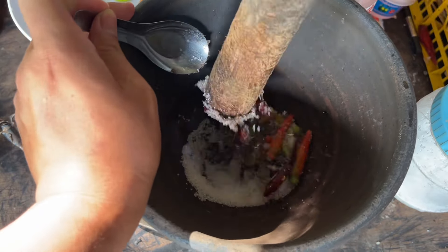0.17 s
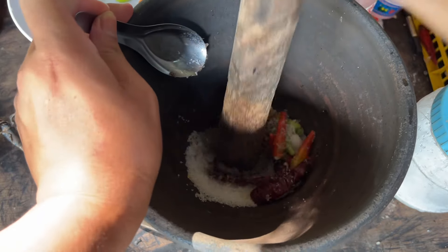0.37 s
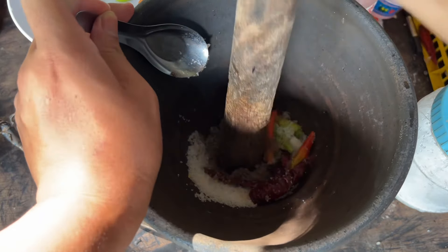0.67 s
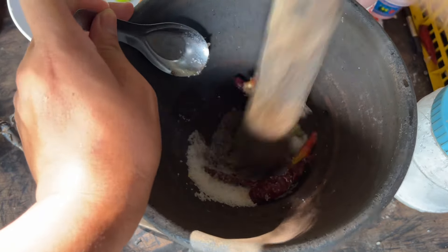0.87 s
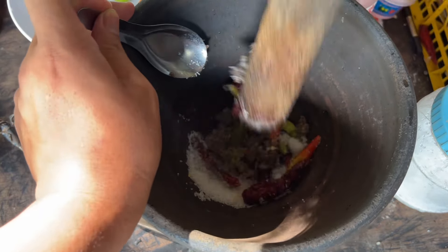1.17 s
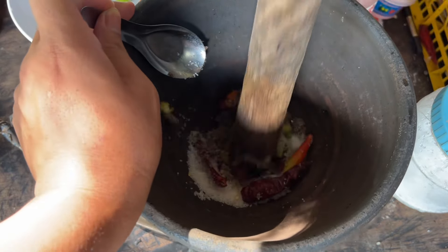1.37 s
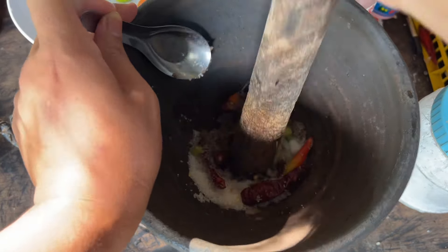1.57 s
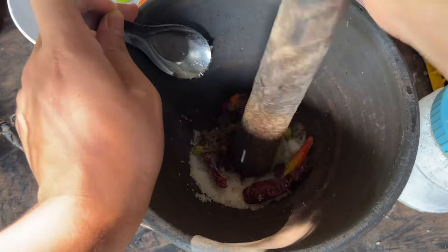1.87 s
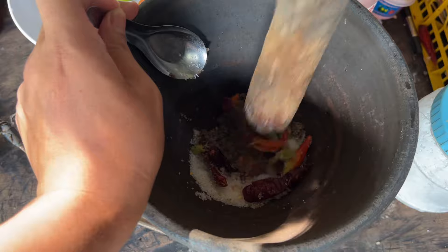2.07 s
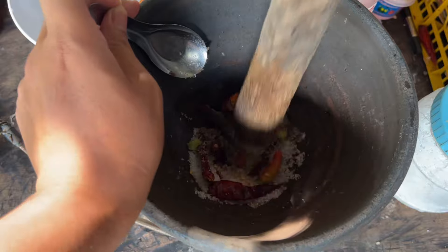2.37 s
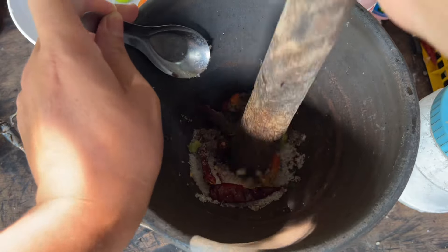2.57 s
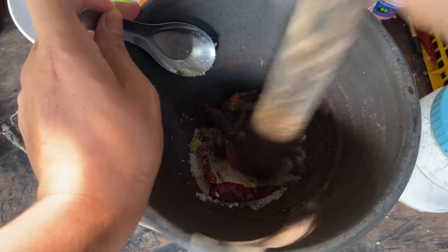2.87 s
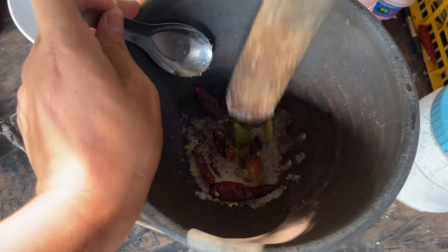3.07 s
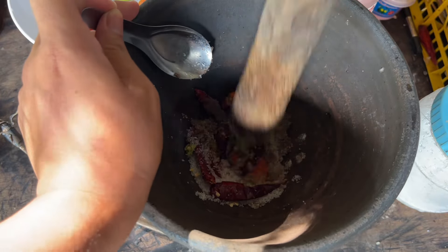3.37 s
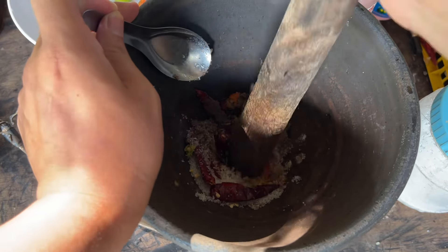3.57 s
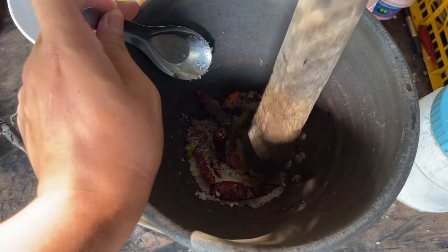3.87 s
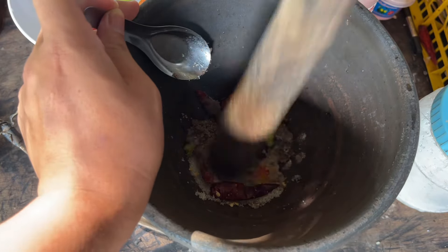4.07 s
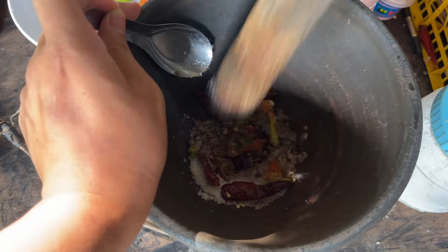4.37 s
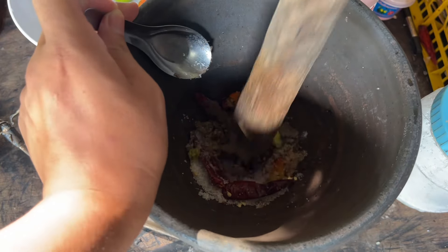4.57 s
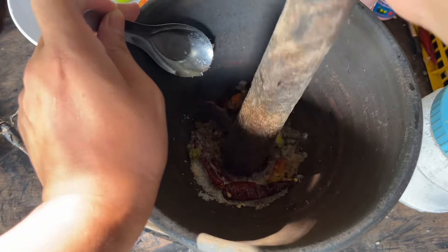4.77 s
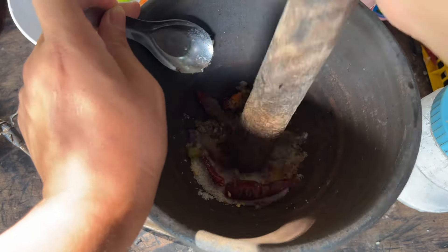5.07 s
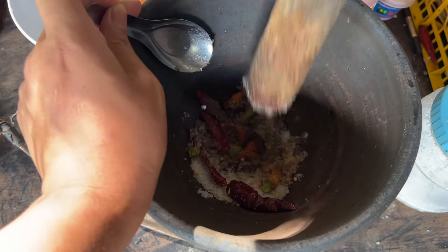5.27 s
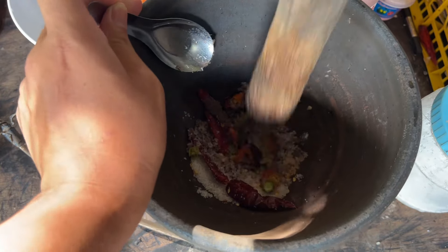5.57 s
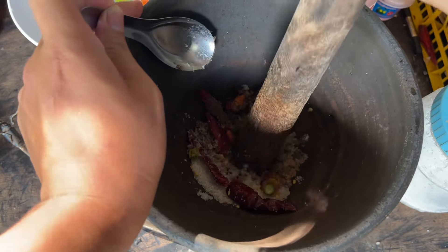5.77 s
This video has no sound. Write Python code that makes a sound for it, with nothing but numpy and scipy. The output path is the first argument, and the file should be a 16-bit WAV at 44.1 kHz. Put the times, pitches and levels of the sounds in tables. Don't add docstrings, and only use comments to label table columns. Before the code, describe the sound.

Steady hollow thuds of wood in a resonant mortar crush crunchy sugar, while a spoon ticks the wall and crumbs patter between strokes.

```python
import sys
import numpy as np
from scipy import signal
from scipy.fft import rfft, irfft
from scipy.io import wavfile
from scipy.ndimage import uniform_filter1d

SR = 44100
rng = np.random.default_rng(int(sys.argv[2]) if len(sys.argv) > 2 else 0)


def boost_factor(decibels):
    exponent = np.asarray(decibels, float) / 20
    return 10 ** exponent


def unload_audio(sound):
    columns = np.transpose(np.atleast_2d(sound))
    steps = np.round(np.clip(columns, -1, 1) * 32767)
    wavfile.write(sys.argv[1], SR, steps.astype(np.int16))


N = 260631
FREQ = np.fft.rfftfreq(N, 1 / SR)
TIME = np.arange(N) / SR

# first touch in seconds, rise in ms, fall in ms, level in dB,
# treble tilt in dB.
CRUSHES = [(0.1837, 9.2, 6.1, -24.5, 0.5), (0.4953, 9.5, 9.5, -23.5, -1), (0.8181, 12.7, 1.4, -21, 1.5),
           (1.1617, 3, 8.5, -21.5, -1), (1.4854, 7.8, 13.4, -24, 4), (1.8127, 12.6, 2.9, -18, 1),
           (2.1434, 3.2, 32, -19, 3.5), (2.4895, 3, 2.4, -21, 0.5), (2.8195, 3.1, 45, -27.5, 3),
           (3.1322, 15.3, 2.9, -19.5, -1), (3.4595, 17.5, 8.1, -26.5, 3), (4.0174, 23.3, 14.6, -20, 0.5),
           (4.3588, 3.1, 2.9, -22, 2), (4.6818, 11, 4, -15, -4), (5.0114, 3.5, 1.5, -25.5, 3),
           (5.3356, 9.6, 15, -24.5, 2.5), (5.6547, 16.4, 6.9, -28.5, 8.5)]
# start in seconds, mortar ring in dB, pestle and cavity in dB,
# floor thud in dB, pitch the spot favours in Hz.
BLOWS = [(0.2009, -0.5, -5.5, -14.5, 479), (0.5202, -16, -13.5, -15.5, 415),
         (0.8481, -10.5, -9, -15.5, 438), (1.184, -14.5, -12, -14, 416), (1.504, -12.5, -12, -12, 570),
         (1.8258, -9, -8.5, -11, 445), (2.1507, -11.5, -27, -14, 555), (2.502, -8, -5, -14, 410),
         (2.8234, -1.5, -8, -20.5, 551), (3.1504, 1.5, -3.5, -13.5, 499), (3.482, -6.5, -4.5, -11, 445),
         (4.0414, -15.5, -15.5, -14, 481), (4.372, -6, -3.5, -17, 399), (4.6954, 0, -1.5, -13.5, 501),
         (5.0349, -31.5, -27.5, -24.5, 420), (5.3508, -18, -12, -15, 578), (5.6728, 1, -4.5, -14.5, 445)]
# delay after the blow in ms, mortar in dB,
# pestle in dB, favoured pitch in Hz.
LIFTS = [(70.24, -18.5, -24.5, 390), (53.7, -25, -25.5, 300), (33.24, -23.5, -26.5, 460),
         (55.5, -22, -23, 440), (60.8, -16, -21.5, 484), (65.2, -12.5, -13.5, 470),
         (46.86, -12, -17.5, 450), (60.4, -17.5, -19.5, 360), (54.8, -46, -32, 850),
         (68.6, -18, -23.5, 425), (60.1, -19, -18.5, 540), (61.16, -28, -20, 430), (64.5, -18.5, -20, 515),
         (67.4, -16.5, -22, 470), (56.1, -29, -23.5, 490), (62.3, -18, -17, 450), (63.3, -22, -19, 532)]
# air squeezed ahead in dB, rim ring under the mortar's in dB, grain spray in dB.
STROKES = [(-1.5, -8.5, -45.5), (3, -40, -42.5), (-0.5, -12.5, -46.5), (1.5, -27.5, -48), (3, -39.5, -49.5),
           (-4, -17, -45), (-6.5, -15, -44.5), (-5, -14.5, -45.5), (6, -11.5, -48.5), (-9, -14.5, -47),
           (-1, -18, -46.5), (-14, -32, -53.5), (-11.5, -13, -49.5), (2, -6, -46.5), (-6, -28, -50.5),
           (-5, -15, -49), (-4.5, -12.5, -47.5)]
# frequency in Hz, level in dB.
CRUSH_COLOUR = [(200, -4.5), (600, -5.5), (1100, 0), (1950, 4), (3500, -2), (5800, -7.5), (9300, -8),
                (11600, -4), (15900, -12.5), (16600, -44)]


def unit(x):
    return x / np.sqrt(np.mean(x ** 2))


def colour(x, points):
    hz, db = np.transpose(points)
    gain_db = np.interp(np.log(FREQ + 1), np.log(hz), db, left=-80, right=-80)
    return unit(irfft(rfft(x) * boost_factor(gain_db), N))


def walk(rate):
    hold = int(SR / rate)
    slewed = np.repeat(rng.standard_normal(N // hold + 1), hold)
    for _ in range(2):
        slewed = uniform_filter1d(slewed, hold, mode="wrap")
    return np.clip(unit(slewed[:N]), -2.5, 2.2)


def grains(points, spiky_db, shared):
    sizes = np.minimum(rng.exponential(size=(3, N)), 5)
    cracks = rng.standard_normal((3, N)) * boost_factor(spiky_db * sizes)
    return colour(np.sqrt(shared) * cracks[0] + np.sqrt(1 - shared) * cracks[1:], points)


def mottle(x, patchy_db, rate):
    edges = 350 * 1.28 ** np.arange(17)
    total = 0
    for k, pair in enumerate(zip(edges, edges[1:])):
        band = signal.butter(2, pair, "band", fs=SR, output="sos")
        total = total + (-1) ** k * boost_factor(patchy_db * walk(rate)) * signal.sosfilt(band, x)
    return unit(total)


def strike(events, modes, push_ms, vary_db, detune, grip_ms=13.0, free=0.85, focus_db=40.0):
    out, t = np.zeros(N + SR), np.arange(SR // 4) / SR
    hz, db, t60 = np.transpose(modes)[:, :, None]
    chance = rng.uniform(-1, 1, (len(events), 2, len(modes), 1))
    push = 1 - np.exp(-(t * 1000 / push_ms) ** 2)
    shape = push * (free + (1 - free) * np.exp(-t * 1000 / grip_ms))
    for (s, peak_db, *favoured), (size, shift) in zip(events, chance):
        octaves_off = np.abs(np.log2(hz / favoured[0])) if favoured else 0
        mode_db = db + vary_db * size - focus_db * octaves_off
        fade = boost_factor(mode_db - 60 * t / np.clip(t60, .005, .4))
        ring = shape * np.sum(fade * np.sin(2 * np.pi * hz * (1 + detune * shift) * t), axis=0)
        start = int(s * SR)
        out[start:start + len(ring)] += boost_factor(peak_db) * ring / np.abs(ring).max()
    return out[:N]


def place(x, pan_db, lead):
    late = np.interp(np.arange(N) - lead, np.arange(N), x)
    return np.array([x * boost_factor(pan_db / 2), late * boost_factor(-pan_db / 2)])


def crumbs(rows):
    out, t = np.zeros((2, N + SR)), np.arange(SR // 20) / SR
    grit = rng.standard_normal((len(rows), 3, len(t)))
    for (s, db, hz, t60_ms), g in zip(rows, grit):
        g = g[0] + 0.63 * g[1:]
        band = signal.butter(1, [hz / 1.35, min(hz * 1.2, .4 * SR)], "band", fs=SR, output="sos")
        fade = np.clip(t / 0.00087, 0, 1) * boost_factor(-60 * t * 1000 / max(t60_ms, 3))
        edge = boost_factor(-16.5) * np.diff(g, prepend=0)
        burst = fade * (unit(signal.sosfilt(band, g)) + edge)
        start = int(s * SR)
        out[:, start:start + len(t)] += boost_factor(db) * burst / np.abs(burst).max()
    return out[:, :N] * boost_factor([[1.2], [-1.2]])


def kitchen():
    # frequency in Hz, level in dB per Hz.
    air_colour = [(15, 1.5), (25, -33), (118, 3.5), (342, 6.5), (558, 1), (937, -16.5), (8060, -26),
                  (10300, -39.5), (11500, -101), (15500, -44), (16800, -33.5)]
    # pitch in Hz, width in Hz, level in dB.
    hum_lines = [(130, 9.9, -53.5), (416, 13, -68), (810, 45, -83)]
    out = boost_factor(-60.0 + 1.5 * walk(2.48)) * grains(air_colour, spiky_db=3.0, shared=0.07)
    for hz, width, db in hum_lines:
        line = [(hz - width, -30), (hz, 0), (hz + width, -30)]
        out = out + boost_factor(db + 2.0 * walk(14)) * grains(line, spiky_db=2.5, shared=0.84)
    return out


def settling():
    # time in seconds, crumbs trickling in dB, shudder of floor and hand in dB.
    restless = [(0.0, -43.5, -34.5), (0.06, -60, -34), (0.14, -56, -33.5), (0.33, -67, -40),
                (0.67, -61, -43), (1.3, -63.5, -50.5), (2.06, -61, -48.5), (2.6, -69, -41),
                (2.91, -59.5, -54.5), (3.399, -65, -45), (3.64, -53.5, -50), (3.85, -66, -51),
                (3.98, -64.5, -61), (4.6, -70, -48.5), (5.499, -60.5, -51.5), (5.91, -60.5, -43.5)]
    # frequency in Hz, level in dB.
    trickle_colour = [(700, -13), (1500, -1), (2500, -2.5), (5000, -6.5), (9200, -7.5), (11500, -7.5),
                      (15900, -9.5), (16500, -44.5)]
    squelch_colour = [(150, 17), (260, 10.5), (550, 6.5), (900, -10.5), (1500, -9.5), (2500, -28.5)]
    shudder_colour = [(20, -43.5), (45, 8.5), (80, 7.5), (130, -1.5), (200, -2), (300, -38)]
    s, trickle_db, shudder_db = np.transpose(restless)
    blows = np.array(BLOWS)[:, 0]
    since = TIME - np.append(-1, blows)[np.searchsorted(blows, TIME)]
    pinned = np.clip(1 - since / 0.092, 0, 1)
    trickle_db = np.interp(TIME, s, trickle_db) - 7 * pinned
    shudder_db = np.interp(TIME, s, shudder_db) - 9.5 * pinned
    falling = mottle(grains(trickle_colour, spiky_db=3.5, shared=.5), patchy_db=2.6, rate=80)
    trickle = boost_factor(trickle_db + 2.5 + 2.2 * walk(24.8)) * falling
    squelch = boost_factor(trickle_db + 5.5 + 3.8 * walk(49)) * grains(squelch_colour, spiky_db=1.5, shared=0.84)
    shudder = boost_factor(shudder_db + 2.7 * walk(8.8)) * grains(shudder_colour, spiky_db=1.5, shared=0.89)
    return trickle + squelch + shudder


def dishes():
    # start in seconds, level in dB.
    nudges = [(0.029, -37), (0.349, -38), (0.395, -53), (0.62, -33.5), (0.7, -39), (0.942, -34),
              (2.031, -34), (2.346, -33), (2.387, -41.5), (2.696, -37.5), (2.729, -44), (2.969, -65.5),
              (3.326, -38.5), (3.367, -43), (3.615, -35.5), (3.722, -38.5), (3.855, -49.5), (4.181, -43),
              (4.899, -45), (5.149, -44), (5.528, -39), (5.579, -43), (5.854, -43.5)]
    # frequency in Hz, level in dB, t60 in seconds.
    dish_modes = [(816.5, -1, 0.13), (1107, -10, 0.1), (1402, -12, 0.085), (445, 3.5, 0.07)]
    return place(strike(nudges, dish_modes, 1.8, vary_db=0, detune=0.018), 0.82, 11.6)


def snaps():
    # start in seconds, level in dB, pitch in Hz, t60 in ms.
    snap_rows = [(0.0983, -35.5, 4070, 12), (0.1995, -10, 1540, 2.5), (0.4928, -32, 3900, 8.7),
                 (0.5004, -35, 2000, 6), (0.5082, -40, 2350, 15), (0.518, -18, 6500, 6.9),
                 (0.5596, -46, 4500, 20), (0.6504, -36, 4000, 57), (0.806, -36, 2500, 8.7),
                 (0.83, -12.5, 2800, 4.6), (1.0914, -48.5, 4550, 10), (1.1702, -11.5, 3670, 12),
                 (1.461, -47, 3000, 13), (1.493, -28, 2760, 7), (1.8243, -16, 4360, 14),
                 (1.882, -22.5, 1830, 98), (2.1494, -3.5, 1950, 2.3), (2.1765, -13, 4000, 13),
                 (2.315, -44.5, 9000, 9.2), (2.358, -37, 3200, 7.8), (2.393, -44, 2700, 6.6),
                 (2.4902, -31.5, 1600, 17), (2.5162, -27.5, 5000, 6.1), (2.7396, -49.5, 3000, 8.9),
                 (2.797, -39.5, 5500, 23), (2.8485, -24, 6140, 14), (3.008, -42.5, 9000, 8),
                 (3.046, -47.5, 5960, 8), (3.1337, -24, 1670, 32), (3.1469, -11.5, 2420, 21),
                 (3.201, -33, 4500, 110), (3.4615, -22.5, 2410, 66), (3.475, -11, 2500, 10),
                 (3.6408, -31, 2090, 14), (3.6591, -33.5, 2210, 14), (3.7135, -52, 2130, 12),
                 (3.722, -40, 2260, 7.5), (3.7529, -45, 3060, 16), (4.0178, -25, 1756, 48),
                 (4.0352, -12, 2052, 11), (4.3645, -17, 2820, 4), (4.6918, -26, 1950, 6.6),
                 (5.0197, -11.5, 2980, 7.2), (5.1114, -38.5, 2160, 6.6), (5.18, -42, 3500, 10),
                 (5.3457, -11, 5340, 17), (5.5756, -43.5, 3000, 23), (5.6599, -17.5, 2860, 60)]
    return crumbs(snap_rows)


def knock_rows():
    # start in seconds, mortar in dB,
    # pestle and cavity in dB, floor in dB.
    slip_rows = [(0.1126, -72, -46, -34.5), (0.539, -51, -45, -22), (0.553, -23.5, -20, -56),
                 (0.831, -18.5, -27.5, -12), (0.889, -40, -27.5, -26), (1.2118, -19, -23.5, -33),
                 (1.535, -17, -19.5, -32.5), (1.8612, -18, -10.5, -18.5), (2.17, -14.5, -8.5, -11.5),
                 (2.5211, -25.5, -10.5, -41), (2.5405, -16.5, -19, -28.5), (2.6286, -67, -35, -32),
                 (3.5141, -16, -18.5, -39), (3.557, -33, -44, -32.5), (4.086, -50.5, -20, -41.5),
                 (5.0198, -18.5, -22, -30.5), (5.0629, -30, -28.5, -27), (5.385, -11, -13.5, -38),
                 (5.7508, -31, -27, -47)]
    blows, lifts, slips = np.array(BLOWS), np.array(LIFTS), np.array(slip_rows)
    lift_s = blows[:, 0] + lifts[:, 0] / 1000
    lift_thud_db = blows[:, 3] - 22
    lifted = np.column_stack([lift_s, lifts[:, 1:3], lift_thud_db, lifts[:, 3]])
    rocked = lifted + [0.034, -18.5, -15, -0.5, 0]
    rocked[:, 0] += 0.01045 * rng.uniform(-1, 1, len(blows))
    slip_hz = 445 + 43.8 * rng.uniform(-1, 1, len(slips))
    return np.vstack([blows, lifted, rocked, np.column_stack([slips, slip_hz])])


def knocks():
    # frequency in Hz, level in dB, t60 in seconds.
    mortar_modes = [(415.6, -6, 0.2), (445, 3.5, 0.074), (512, 0, 0.14), (541, -4, 0.17), (570.7, 2, 0.11),
                    (656, -19.5, 0.018), (694, 2, 0.022), (843, -17, 0.42)]
    cavity_modes = [(168.2, 1.5, 0.091), (190.9, -1, 0.15), (216, 0.5, 0.098), (261.7, -4, 0.12),
                    (323.6, -4.5, 0.21), (364.3, -3, 0.18)]
    floor_modes = [(46, 1.5, 0.35), (68.4, 5.5, 0.14), (82.8, 0.5, 0.15), (101.7, -4.5, 0.2),
                   (128.4, 5.5, 0.15)]
    pestle_modes = [(185.2, 0, 0.043), (219, 0.5, 0.069), (249.6, 2.5, 0.18), (299.6, -9.5, 0.12),
                    (368.5, -3, 0.11)]
    squeeze_modes = [(692, 2.5, 0.055), (730.5, 1.5, 0.028)]
    rim_modes = [(602, 3.5, 0.09), (706, 6, 0.077), (795, 2, 0.043), (833.4, -6.5, 0.11)]
    push_ms = (1.8, 3.12, 7.56)
    # favoured floor pitch in Hz, favoured cavity pitch in Hz.
    low_notes = [(118, 230), (77.5, 247), (118, 238), (105.4, 223), (112, 170), (106, 196), (95, 220),
                 (116, 205), (92, 260), (87, 263), (96, 194), (115, 330), (99, 207), (107.6, 230),
                 (76, 310), (77.3, 196), (120, 235)]
    # frequency in Hz, level in dB.
    debris_colour = [(400, -9.5), (700, 1), (830, 4.5), (960, -2.5), (1130, 5.5), (1300, -8.5), (1480, 1.5),
                     (1750, -5.5), (2100, -5.5), (2850, -13.5), (6000, -23.5), (11500, -34), (16500, -57)]

    table = knock_rows()
    touches = np.array(CRUSHES)[:, 0]
    stroke = np.maximum(np.searchsorted(touches, table[:, 0]) - 1, 0)
    down = table[:, 0] - touches[stroke] < .05
    table = np.column_stack([table, np.array(low_notes)[stroke]])
    mortar = strike(table[:, [0, 1, 4]], mortar_modes, push_ms[0], vary_db=4.5, detune=0.024,
                    grip_ms=18.0, free=0.47, focus_db=21.0)
    cavity = strike(table[down][:, [0, 2, 6]], cavity_modes, push_ms[1], vary_db=2.5, detune=0.036,
                    grip_ms=5.3, free=0.32, focus_db=12.5)
    ahead = table[down][:, [0, 1]] - [.012, 24.0]
    ahead[:len(BLOWS), 1] += np.array(STROKES)[:, 0]
    squeeze = strike(ahead, squeeze_modes, 8.8, vary_db=0, detune=0.086)
    pestle = strike(table[~down][:, [0, 2]], pestle_modes, 3.37, vary_db=1.5, detune=0.039)
    floor = strike(table[:, [0, 3, 5]], floor_modes, push_ms[2], vary_db=3.5, detune=0.084,
                   grip_ms=32.0, free=0.8, focus_db=8.0)
    rim_rows = [(s, db + rim_db) for (s, db, *_), (_, rim_db, _) in zip(BLOWS, STROKES)]
    rim = strike(rim_rows, rim_modes, 0.64, vary_db=6.0, detune=0.048)

    motion = np.abs(mortar) + 0.047 * np.abs(cavity + pestle)
    shaking = np.abs(uniform_filter1d(motion, size=500)) ** 0.52
    lumps = mottle(grains(debris_colour, spiky_db=2.5, shared=.5), patchy_db=3.2, rate=80)
    debris = boost_factor(-25) * shaking * lumps
    stone = place(mortar + squeeze + rim, 0.26, 8.0)
    hollow = place(cavity + pestle, 0.28, 12.5)
    return stone + hollow + place(floor, -0.84, 3.0) + debris


def crush():
    force = np.zeros(N)
    tilt_db = np.interp(TIME, *np.array(CRUSHES)[:, [0, 4]].T)
    for (s, rise, fall, db, _), (blow_s, *_) in zip(CRUSHES, BLOWS):
        ms = (TIME - s) * 1000
        hold = max((blow_s - s) * 1000 - rise, .5)
        corners = np.cumsum([-1, 1, rise, hold, fall, 45.0])
        levels_db = [-21.5, -27.5, -5.5, -4.0, -28.0, -61.5]
        force += boost_factor(db + np.interp(ms, corners, levels_db, left=-120, right=-120))
    grit = grains(CRUSH_COLOUR, spiky_db=4.5, shared=0.4)
    dull = signal.sosfilt(signal.butter(2, 6500, fs=SR, output="sos"), grit)
    bright = boost_factor(tilt_db + 4.5) * (grit - dull)
    patchy = boost_factor(2.5 * walk(400))
    return force * patchy * (dull * boost_factor([[2.1], [-2.1]]) + bright) * boost_factor(1.5)


def chips():
    count, low_hz, high_hz, t60_s = 48, 898, 9000, 0.04
    out, t = np.zeros(N + SR), np.arange(SR // 25) / SR
    chance = rng.random((len(BLOWS), count, 3))
    for crushed, blow, lift, stroke, rows in zip(CRUSHES, BLOWS, LIFTS, STROKES, chance):
        for k, (when, pitch, size) in enumerate(rows):
            if k < count // 3:
                s = blow[0] - (blow[0] - crushed[0]) * when ** 2
                db = crushed[3] - 7 - 9.2 * when
            else:
                s = blow[0] + 2.6 * when * lift[0] / 1000
                db = stroke[2] + 12 - 26.0 * when
                pitch = 0.85 * pitch
            hz = low_hz * (high_hz / low_hz) ** pitch
            fade = np.clip(t / 0.0031, 0, 1) * boost_factor(db - 8.0 * size - 60 * t / t60_s)
            start = int(s * SR)
            out[start:start + len(t)] += fade * np.sin(2 * np.pi * hz * t)
    return place(out[:N], 1.5, 0.94)


def spray():
    # frequency in Hz, level in dB.
    spray_colour = [(700, -9), (1200, -12.5), (2500, 4.5), (5000, 1), (9000, -5), (12000, -6.5),
                    (15900, -12)]
    force = np.zeros(N)
    for (s, *_), (lift_ms, *_), (*_, db) in zip(BLOWS, LIFTS, STROKES):
        lift_s = s + lift_ms / 1000
        corners = [s, s + 0.0028, lift_s, lift_s + 0.005, lift_s + 0.38]
        force += boost_factor(db + np.interp(TIME, corners, [-40, -0.5, -4, -6.0, -64], left=-120, right=-120))
    crunch = mottle(grains(spray_colour, spiky_db=4.6, shared=.6), patchy_db=4.6, rate=75)
    return force * boost_factor(2.0 * walk(99)) * crunch


def stray_crumbs():
    # start in seconds, level in dB, pitch in Hz, t60 in ms.
    stray_rows = [(0.232, -32, 2780, 61), (0.361, -42, 4500, 9.1), (1.234, -39, 1700, 35),
                  (1.409, -53, 5100, 12), (1.444, -45, 1800, 12), (2.655, -44, 1550, 15),
                  (3.556, -36, 6000, 30), (3.68, -46, 6500, 40), (3.785, -51, 6500, 45),
                  (3.96, -54, 3000, 9.1), (4.335, -60, 13500, 10)]
    return crumbs(stray_rows)


def spoon():
    # start in seconds, level in dB, pitch the spot favours in Hz.
    clinks = [(0.334, -39, 5200), (0.705, -55, 4750), (0.9435, -43.5, 4500), (1.214, -44, 3200),
              (1.2954, -34.5, 4430), (1.499, -18, 2800), (1.555, -35.5, 4400), (1.618, -40.5, 4300),
              (1.674, -54.5, 3300), (1.948, -38.5, 4400), (2.026, -51.5, 3590), (2.166, -19.5, 2922),
              (2.177, -11, 4000), (2.348, -42.5, 3550), (2.517, -15, 3230), (2.695, -53.5, 3200),
              (2.824, -22, 2850), (2.847, -23.5, 3100), (2.888, -40, 4800), (3.275, -33.5, 4700),
              (4.121, -43, 3600), (4.3631, -17.5, 2970), (5.1317, -41, 3200), (5.7992, -52, 3200)]
    # frequency in Hz, level in dB, t60 in seconds.
    bowl_modes = [(1430, -4, .07), (2270, -10, .07), (2950, -4, .08), (3214, -4, .11), (4086, 0, .06),
                  (4807, -3, .07), (5640, -12, .06), (6500, -6, .1), (7560, -14, .04), (8860, -14, .06)]
    slap_modes = [(2827, 0.5, 0.057), (3637, -7, 0.071), (3880, -22.5, .02), (5200, -0.5, 0.017),
                  (6100, -13.5, 0.005), (8600, 3, 0.022), (7840, 0.5, 0.024), (9420, -6, 0.035),
                  (11100, -24.5, .015)]
    hard_db = -26.0
    light_rows = [c for c in clinks if c[1] < hard_db]
    hard_rows = [c for c in clinks if c[1] >= hard_db]
    light = strike(light_rows, bowl_modes, .15, vary_db=4.0, detune=.015, grip_ms=5.0, free=.4, focus_db=13.0)
    hard = strike(hard_rows, slap_modes, .25, vary_db=1.2, detune=.008, grip_ms=4.0, free=.45, focus_db=8.0)
    chatter = boost_factor(6.5 * walk(420)) * (light + hard)
    rubbing = uniform_filter1d(boost_factor(-4) * np.abs(light) + boost_factor(-8) * np.abs(hard), size=60)
    return place(chatter, 6.0, 1) + rubbing * grains(CRUSH_COLOUR, spiky_db=3.0, shared=.7)


def scrape():
    # time in seconds, level in dB.
    drag = [
        (3.56, -65.5),
        (3.62, -55),
        (3.66, -42),
        (3.7, -46.5),
        (3.76, -59),
        (3.82, -64),
    ]
    # frequency in Hz, level in dB.
    drag_colour = [(700, -16), (1300, -8.5), (2300, 5.5), (3200, -16), (6500, -7), (12000, -6.5),
                   (16500, -36)]
    drag_db = np.interp(TIME, *np.transpose(drag), left=-120, right=-120)
    grit = grains(drag_colour, spiky_db=2.0, shared=0.4)
    return boost_factor(drag_db - 7.0) * mottle(grit, patchy_db=5.0, rate=110)


def walls(x, t60, wet_db):
    t = np.arange(SR // 3) / SR
    echoes = rng.standard_normal((2, len(t))) * boost_factor(-60 * t / t60) * np.clip(t / 0.00071, 0, 1)
    echoes = echoes / np.sqrt(np.sum(echoes[0] ** 2))
    return boost_factor(wet_db) * signal.fftconvolve(x[None], echoes, axes=1)[:, :N]


def scene():
    near = crush() + knocks() + spoon() + snaps() + dishes()
    loose = settling() + scrape() + spray() + chips() + stray_crumbs()
    return near + walls(near.mean(axis=0), t60=0.21, wet_db=-16.5) + loose + kitchen()


def drop_treble(x):
    # frequency in Hz, level in dB above which a band is kept.
    kept_above = [(8000, -99), (9500, -92), (11000, -81), (12500, -86), (14000, -93), (16000, -86.5)]
    hz, _, frames = signal.stft([x[0] + x[1], x[0] - x[1]], SR, nperseg=2048)
    for first in range(368, 768, 16):
        band = slice(first, first + 16)
        level_db = 10 * np.log10(np.sum(np.abs(frames[:, band]) ** 2, axis=1) / 2 + 1e-18)
        keep_db = np.interp(hz[first], *np.transpose(kept_above))
        quiet = level_db.max(axis=0) < -48.0
        masked_db = np.where(quiet, level_db[::-1] - 8, -200)
        scatter_db = 2 * rng.standard_normal(level_db.shape)
        margin_db = level_db - np.maximum(keep_db, masked_db) + scatter_db
        frames[:, band] *= np.clip(margin_db / 2, 0, 1)[:, None]
    mid, side = signal.istft(frames, SR, nperseg=2048)[1][:, :N]
    return np.array([mid + side, mid - side]) / 2


def roll_off(x):
    return signal.sosfilt(signal.butter(12, 16970, fs=SR, output="sos"), x)


def record(dry):
    # frequency in Hz, left over right in dB, side gain in dB.
    port_gains = [(30, 6.5, 4), (70, -0.5, -2.5), (150, -1, 0), (304, -1.5, -2.5), (1000, 1.5, 6.5),
                  (2000, 0, -0.5), (4000, 2, 4), (6500, 8.5, 1.5), (9000, -1.5, -1.5), (12100, 1, -7.5)]
    # frequency in Hz, phase by which left leads in radians.
    port_phase = [(0, 0), (7670, .5), (9220, -.8), (9910, -3.1), (10900, -3.8), (11400, -6), (12800, -6.4),
                  (13500, -8.7), (15200, -12.4), (16500, -12.6)]
    # frequency in Hz, width in Hz, depth in dB.
    treble_notches = [(10050, 160, -3.5), (13500, 840, -5.5)]
    hz, pan_db, side_db = np.transpose(port_gains)
    pan_db = np.interp(np.log(FREQ + 1), np.log(hz), pan_db)
    side_db = np.interp(np.log(FREQ + 1), np.log(hz), side_db)
    sign = np.array([[1], [-1]])
    left, right = rfft(dry)
    pair = ((left + right) + sign * boost_factor(side_db) * (left - right)) / 2
    lead = np.interp(FREQ, *np.transpose(port_phase))
    turn = boost_factor(sign * pan_db / 2) * np.exp(.5j * lead * sign)
    notch_gain = boost_factor(sum(db * np.exp(-((FREQ - hz) / width) ** 2) for hz, width, db in treble_notches))
    top = np.clip((16150 - FREQ) / 300, 0, 1) ** 2
    bass_cut = signal.butter(2, 52.0, "high", fs=SR, output="sos")
    ports = signal.sosfilt(bass_cut, irfft(pair * turn * notch_gain * top, N))
    rounded = ports / (1 + np.abs(ports) ** 6) ** (1 / 6)
    mix = drop_treble(rounded)
    return roll_off(mix)


dry = scene()
out = record(dry)
unload_audio(out)
```